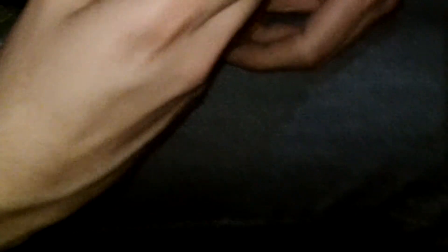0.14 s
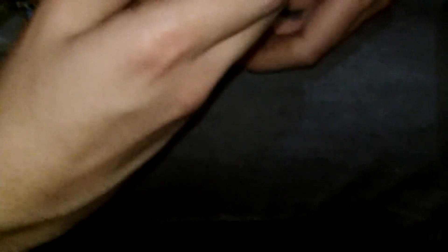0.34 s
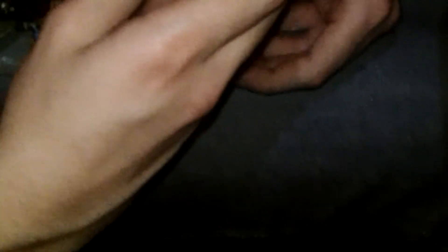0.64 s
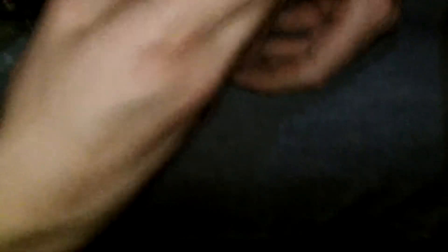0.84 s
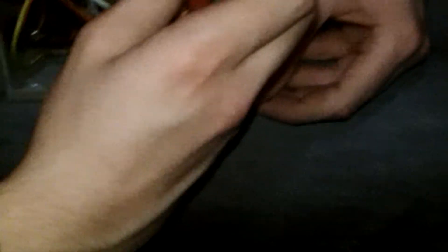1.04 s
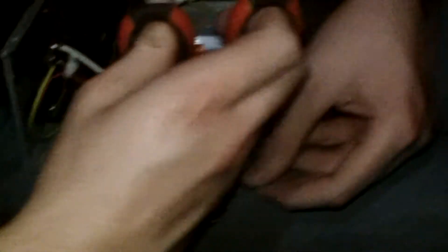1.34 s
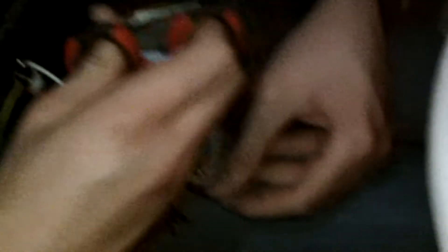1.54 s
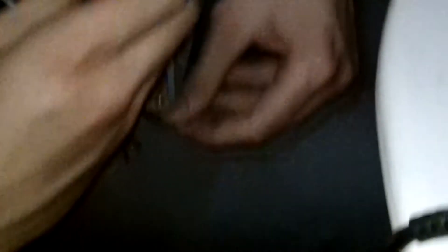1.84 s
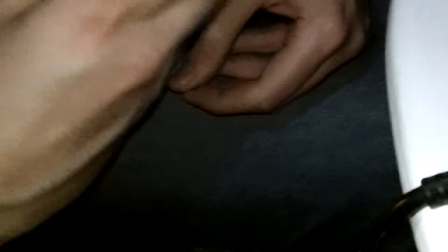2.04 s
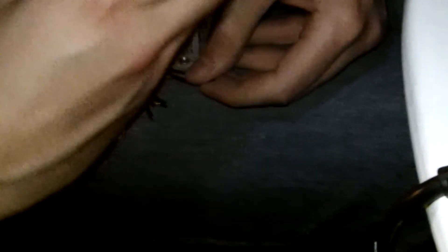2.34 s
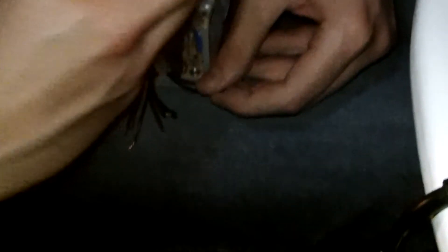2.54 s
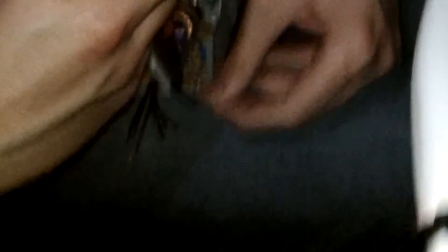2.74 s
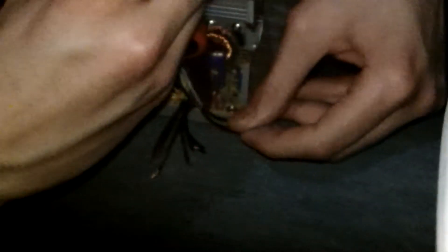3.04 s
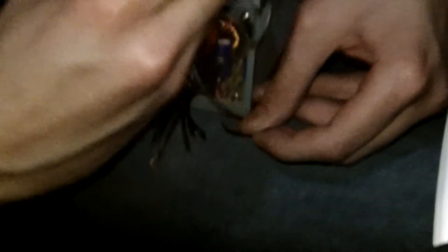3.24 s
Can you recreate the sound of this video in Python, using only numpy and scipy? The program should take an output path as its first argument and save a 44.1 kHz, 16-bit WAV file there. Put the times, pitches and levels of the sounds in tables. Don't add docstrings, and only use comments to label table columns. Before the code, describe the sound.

Loud metallic snip of cutters severing a cable, preceded by quiet wire handling over faint hum

```python
import sys
import numpy as np
from scipy import signal
from scipy.fft import rfft, irfft, next_fast_len
from scipy.io import wavfile
from scipy.ndimage import map_coordinates

SR = 44100
rng = np.random.default_rng(int(sys.argv[2]) if len(sys.argv) > 2 else 0)


def field_ratio(decibels):
    return 10 ** (np.asarray(decibels, dtype=float) / 20)


def wav_out(sig):
    wavfile.write(sys.argv[1], SR, np.round(np.clip(np.atleast_2d(sig).T, -1, 1) * 32767).astype(np.int16))


N = 149940

# centre [Hz], width [Hz], level [dB]
WIRE = [(2470, 410, 5.5), (3450, 1300, -11)]
# centre [Hz], width [Hz], level [dB]
JAW = [(7860, 1100, -4.5), (5400, 3400, -3.5), (10200, 3700, -4)]


def unit(x):
    return x / np.sqrt(np.mean(x ** 2) + 1e-20)


def along(points, hz):
    f, v = np.transpose(points)
    return np.interp(np.log(hz + 1), np.log(f + 1), v)


def filtered(x, response):
    m = next_fast_len(x.shape[-1] + 8192)
    spectrum = rfft(x, m) * response(np.fft.rfftfreq(m, 1 / SR))
    return irfft(spectrum, m)[..., :x.shape[-1]]


def body(peaks):
    def response(f):
        total = 0
        for k, (centre, width, db) in enumerate(peaks):
            damping = 1j * f * width
            total = total + (-1) ** k * field_ratio(db) * damping / (centre ** 2 - f ** 2 + damping)
        return total
    return response


def wobble(rate):
    knots = rng.standard_normal(int(N * rate / SR) + 4)
    return map_coordinates(knots, [np.arange(N) * rate / SR])


def sides(pan_db):
    return field_ratio([[pan_db / 2], [-pan_db / 2]])


def burst(peaks, t60, hold=0, blow=2.1):
    t = np.arange(2048) / SR
    rattle = rng.standard_normal(len(t)) * field_ratio(-60 * np.maximum(t - hold, 0) / t60)
    x = filtered(rattle + blow * (t == 0), body(peaks))
    return x / np.abs(x).max()


def click(response, late=0):
    x = filtered(np.arange(2048) == late, response)
    return x[None] / np.linalg.norm(x)


def add(track, s, sound):
    track[:, round(s * SR):][:, :sound.shape[-1]] += sound


def fingers():
    # centre [Hz], width [Hz], level [dB]
    skin = [(1130, 530, -11), (2200, 750, 4.5), (4100, 1370, -4.5)]
    # centre [Hz], width [Hz], level [dB]
    gloss = [(5450, 6800, -2), (11340, 2100, 0.5)]
    # start_s [s], length_s [s], level_db [dB], bright_db [dB], rise [share spent rising]
    strokes = [
        (-.05, 0.21, -59.5, -5.5, 0.44),
        (0.178, 0.14, -54, -7.5, 0.5),
        (0.3, 0.2, -52, -10.5, 0.58),
        (0.506, 0.19, -48, -10.5, 0.22),
        (0.602, 0.12, -53, -6, 0.85),
        (0.786, 0.18, -49.5, 0, 0.55),
        (1.023, 0.56, -57.5, -5.5, 0.15),
    ]
    rub_db, sheen_db, low_cut_hz = -1, 4.5, 1200
    t = np.arange(N) / SR
    roughness_db = 2 * wobble(180) + 1.5 * wobble(29.97)
    grains = rng.standard_normal((2, N)) * field_ratio(roughness_db)
    dull = unit(filtered(grains[0], body(skin)))
    sheen = unit(filtered(grains[1], lambda f: body(gloss)(f) * f ** 4 / (f ** 4 + low_cut_hz ** 4)))
    out = np.zeros(N)
    for start_s, length_s, level_db, bright_db, rise in strokes:
        u = (t - start_s) / length_s
        ramp = np.clip(np.minimum(u / rise, (1 - u) / (1 - rise)), 0, 1)
        shape = np.sin(np.pi / 2 * ramp) ** 1.16
        out += shape * field_ratio(level_db + rub_db) * (dull + field_ratio(bright_db + sheen_db) * sheen)
    return sides(-6.5) * out


def room(x):
    # pitch_hz [Hz], t60_s [s]
    decay = [(200, 0.24), (1000, 0.43), (3000, 0.36), (7000, 0.32), (13000, 0.28)]
    predelay_s, alike = 0.001025, 0.56
    a, b = rng.standard_normal((2, SR // 2))
    noise = [a + (1 - alike) * b, a - (1 - alike) * b]
    hz, t, z = signal.stft(noise, SR, nperseg=256)
    fade = field_ratio(-60 * t / along(decay, hz)[:, None])
    tail = signal.istft(z * fade, SR, nperseg=256)[1]
    tail = tail / np.linalg.norm(tail[0])
    delayed = np.pad(x.mean(0), (round(predelay_s * SR), 0))[None]
    return signal.fftconvolve(delayed, tail, axes=1)[:, :N]


def hum():
    # multiple [of the mains pitch], level_db [dB rms]
    multiples = [(1, -54.5), (3, -57.5), (5, -62), (7, -68), (9, -77.5), (11, -73.5), (13, -75)]
    # start_s [s], length_s [s], extra hum level_db [dB]
    touches = [
        (0.169, 0.031, 6.5),
        (0.519, 0.094, 7),
        (.68, 0.21, 6),
        (1.016, 0.17, 5.5),
    ]
    # start_s [s], peak level_db [dB], corner pitch_hz [Hz]
    pops = [
        (.165, -40, 400),
        (.528, -32, 500),
        (.6765, -29, 600),
        (1.064, -31.5, 400),
        (2.707, -36, 500),
    ]
    mains_hz, start, turn, bass_cut_lead = 49.965, 2.05, -.75, 1.25
    edge_s, drift_db, pan_db = 0.0049, 0.63, -3
    t = np.arange(N) / SR
    touch_db = np.zeros(N)
    for start_s, length_s, level_db in touches:
        on = np.clip((t - start_s) / edge_s, 0, 1)
        off = np.clip((start_s + length_s - t) / edge_s, 0, 1)
        touch_db += level_db * on * off
    wave = np.zeros(N)
    for k, level_db in multiples:
        phase = k * (2 * np.pi * mains_hz * t + start) + turn + bass_cut_lead / k ** 2
        wave += field_ratio(level_db + drift_db * wobble(5.86)) * np.sqrt(2) * np.sin(phase)
    out = sides(pan_db) * wave * field_ratio(touch_db)
    u = np.arange(1024) / SR
    for start_s, level_db, pitch_hz in pops:
        fall = 2 * np.pi * pitch_hz * u
        add(out, start_s, sides(pan_db) * field_ratio(level_db) * (1 - fall) * np.exp(-fall))
    return out


def hiss():
    # pitch_hz [Hz], level_db [dB per Hz]
    colour = [(240, -32), (400, -7), (793, -3.5), (1370, -6.5), (1800, -8), (2480, -8), (2890, -9.5),
              (15200, -12.5)]
    colour = [(150, -26)] + list(colour) + [(15600, -62)]
    noise = rng.standard_normal((2, N))
    return field_ratio(-56 + 3) * unit(filtered(noise, lambda f: field_ratio(along(colour, f))))


def rumble():
    # pitch_hz [Hz], level_db [dB per Hz]
    colour = [(20, -30), (45, -6), (75, -7), (120, -10), (200, -5), (350, -9), (700, -16), (1500, -40)]
    noise = rng.standard_normal((2, N))
    mid, side = unit(filtered(noise, lambda f: field_ratio(along(colour, f))))
    return field_ratio(-59.5) * (mid + field_ratio(-5.5) * np.array([side, -side]))


def knocks(out, far):
    # start_s [s], peak level_db [dB], pitch [factor], hard_db [dB], echo_db [dB]
    hits = [
        (0.2008, -40.5, 1.46, -8.5, 0.5),
        (0.2747, -39, 0.93, -16, 4),
        (.72, -44.5, 0.96, -18, 5),
        (.749, -46, 1.9, -14, -5),
        (1.3021, -20.5, 1.034, -2, 1.5),
        (1.3082, -31.5, 1.13, -22, 0),
        (1.787, -45, 1.36, -16, -8),
        (2.2245, -38, 1.07, -24, 5),
        (2.236, -41, 1, -19, 4.5),
        (2.959, -39, 1.22, -9, -5.5),
    ]
    # centre [Hz], width [Hz], level [dB]
    board = [(500, 240, -2.5), (885, 240, 8.5), (1490, 320, 2.5)]
    # centre [Hz], width [Hz], level [dB]
    edge = [(2220, 660, 3), (3430, 890, 3), (4630, 1350, -1.5), (8600, 4100, -15)]
    for start_s, level_db, pitch, hard_db, echo_db in hits:
        peaks = [(hz * pitch, width * pitch, db) for hz, width, db in board]
        peaks += [(hz, width, db + hard_db) for hz, width, db in edge]
        add(out, start_s, sides(1.2) * field_ratio(level_db + 3) * burst(peaks, t60=0.0089))
        add(far, start_s, field_ratio(level_db + echo_db + 12.5) * click(body(peaks)))


def ticks(out, far):
    # start_s [s], peak level_db [dB], bright_db [dB of jaw over wire], pan_db [dB]
    touches = [(0.262, -39.5, 0, -0.5), (0.9564, -35, 13, 3), (1.0228, -35, 9, 1), (1.0887, -44, -4, 8),
               (1.1156, -30.5, 1, -5), (1.1169, -38.5, -2, 23), (1.1329, -30, 4, -7),
               (1.1386, -53, 0, -1.5), (1.173, -42, 0, -4), (1.1999, -37, -8.5, 8),
               (2.8389, -43.5, -14, 0.5), (2.9949, -28.5, 27, 5.5), (3.2896, -29, 1, 3)]
    t60 = 0.015
    for start_s, level_db, bright_db, pan_db in touches:
        tick = burst(WIRE, t60) + field_ratio(bright_db + 3) * burst(JAW, t60)
        tick = tick / np.abs(tick).max()
        add(out, start_s, sides(pan_db) * field_ratio(level_db + 1) * tick)
        add(far, start_s, field_ratio(level_db - 0.5) * click(body(WIRE + JAW)))


def scrapes(out, far):
    # start_s [s], length_s [s], level_db [dB]
    slides = [
        (1.2895, 0.0093, -35),
        (1.294, 0.0011, -34),
        (2.2, .017, -49),
        (2.212, 0.0029, -42),
        (3.291, 0.016, -51),
    ]
    for start_s, length_s, level_db in slides:
        slips = rng.standard_normal(2048) * (np.arange(2048) < length_s * SR)
        add(out, start_s, field_ratio(level_db) * filtered(slips, body(WIRE[1:] + JAW))[None])
        energy = np.sqrt(length_s * SR)
        add(far, start_s, field_ratio(level_db - 1.5) * energy * click(body(WIRE + JAW[1:])))


def pings(out):
    # start_s [s], level_db [dB]
    rings = [
        (2.9953, -36.5),
        (3.012, -49),
        (3.292, -40),
    ]
    # pitch_hz [Hz], level_db [dB], t60_s [s]
    modes = [(7280, 0, .03), (3350, -9, .035), (10000, -8, .01)]
    t = np.arange(2048) / SR
    ring = sum(field_ratio(db - 60 * t / t60) * np.sin(2 * np.pi * hz * t) for hz, db, t60 in modes)
    for start_s, level_db in rings:
        add(out, start_s, sides(3.0) * field_ratio(level_db) * ring)


def handling():
    out, far = np.zeros((2, N)), np.zeros((1, N))
    knocks(out, far)
    ticks(out, far)
    scrapes(out, far)
    pings(out)
    return out, far


def snap():
    # start_s [s], peak level_db [dB]
    blows = [
        (3.0795, 6),
        (3.0835, -3),
        (3.0858, -9),
    ]
    # centre [Hz], width [Hz], level [dB]
    steel = [(444, 160, -16.5), (1070, 310, -8), (2550, 330, -5), (4400, 580, -5.5), (5180, 450, -6.5),
             (6360, 470, -10), (7790, 700, -2.5), (9620, 740, -1), (11040, 370, -10), (12100, 710, -3)]
    # pitch_hz [Hz], level_db [dB per Hz]
    wall_colour = [(150, -50), (250, -14), (542, -12), (1260, -4), (1740, -7.5), (2590, -5.5), (5510, -3),
                   (7260, -1.5), (15200, -17)]
    t60, hold_s, apart_share = .009, .0016, 0.63
    out, far = np.zeros((2, N)), np.zeros((1, N))
    for k, (start_s, level_db) in enumerate(blows):
        hold = hold_s if k == 0 else 0
        near = burst(steel, t60, hold, blow=6)
        apart = apart_share * burst(steel[2:], t60)
        add(out, start_s, sides(-1.5) * field_ratio(level_db) * np.array([near + apart, near - apart]))
    echo = click(lambda f: field_ratio(along(wall_colour, f)), late=128)
    add(far, blows[0][0], field_ratio(14.5) * echo)
    return out, far


def scene():
    rub = fingers()
    taps, taps_far = handling()
    cut, cut_far = snap()
    near = rub + taps + cut
    echo = room(taps_far + field_ratio(-4) * rub) + room(cut_far)
    return near + echo + hum() + hiss() + rumble()


def low_pass(x):
    return signal.sosfilt(signal.butter(12, 15350, fs=SR, output="sos"), x)


def record(dry):
    clip_top, hardness, top_hz = 1.1, 6, 15500
    clipped = dry / (1 + np.abs(dry / clip_top) ** hardness) ** (1 / hardness)
    mix = filtered(clipped, lambda f: 1 / (1 + (f / top_hz) ** 40) * (f > 20))
    return low_pass(mix)


dry = scene()
out = record(dry)
wav_out(out)
```